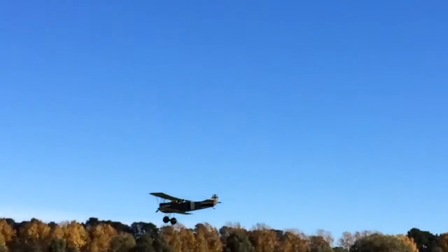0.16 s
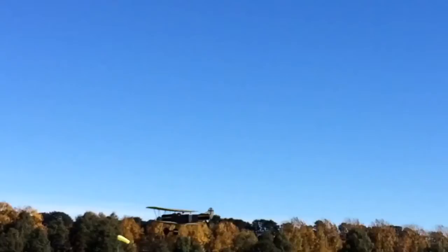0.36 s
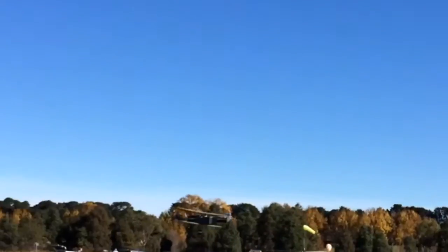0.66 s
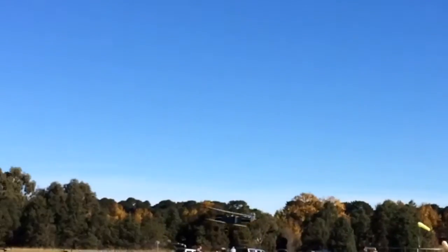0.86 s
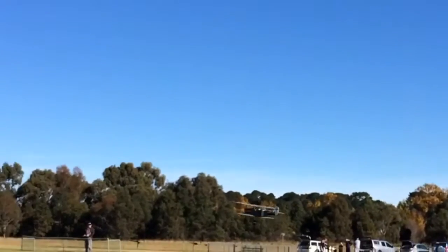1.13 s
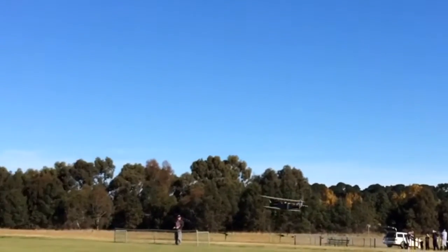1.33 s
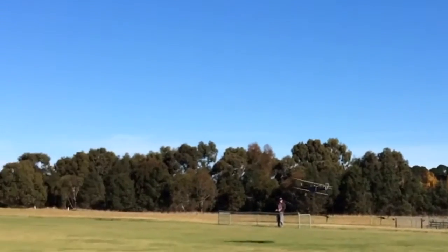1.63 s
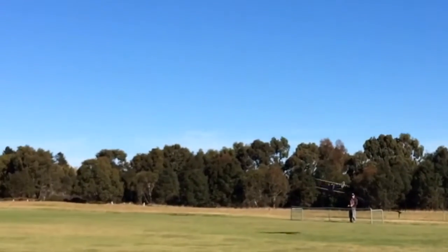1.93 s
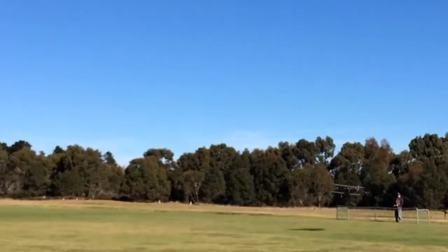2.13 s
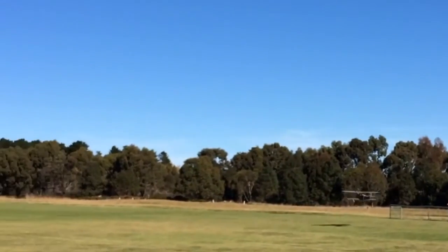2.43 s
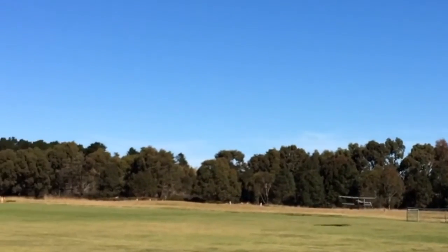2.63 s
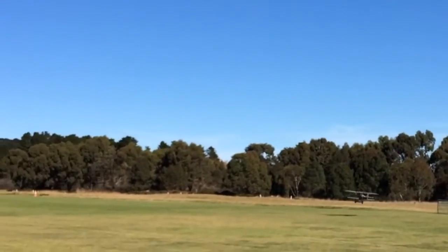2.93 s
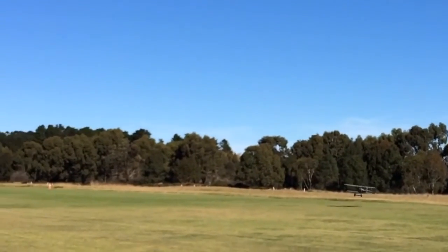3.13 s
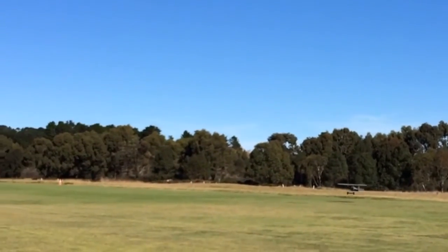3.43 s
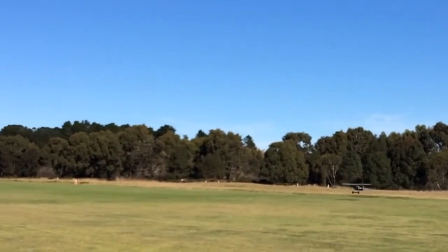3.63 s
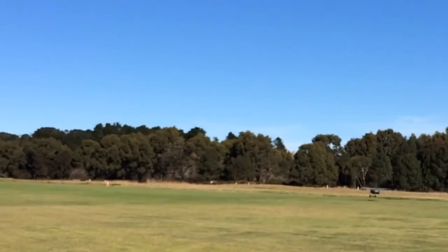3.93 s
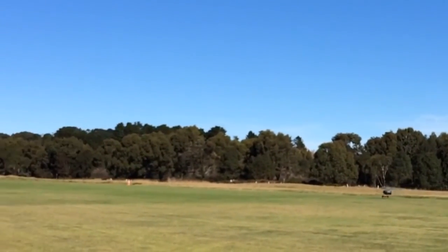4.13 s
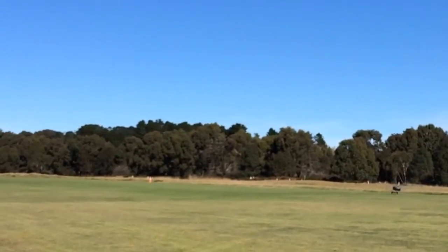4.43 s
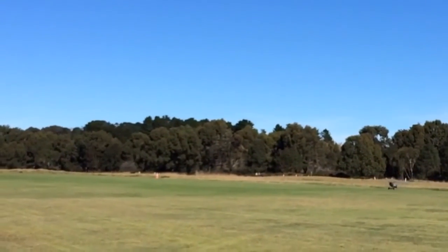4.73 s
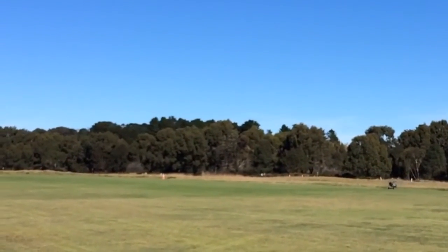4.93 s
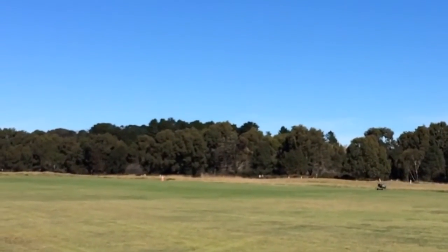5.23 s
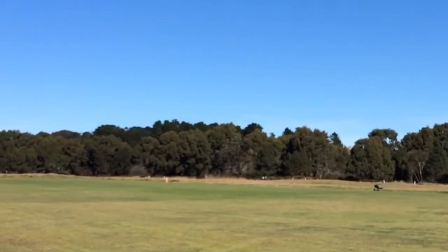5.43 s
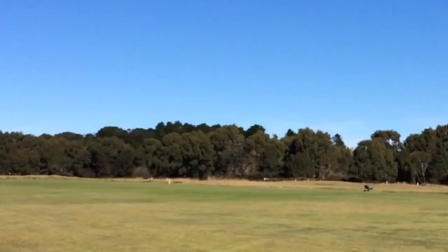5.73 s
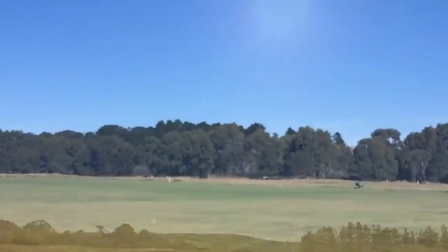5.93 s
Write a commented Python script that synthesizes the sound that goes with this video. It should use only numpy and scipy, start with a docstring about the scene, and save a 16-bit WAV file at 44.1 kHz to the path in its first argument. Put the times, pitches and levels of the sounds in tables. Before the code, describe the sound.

A small electric model biplane glides past with a faint airy whistle, over low wind on the microphone and a distant idling engine.

```python
"""A grass field, one microphone in the open. An electric model biplane glides low past, about 11 m off:
air rushes over it, its wires whistle, its propeller winds down and its motor controller sings thinly.
Low wind lies on the microphone. Far off, leaves hiss and an engine idles with a light clatter.
An insect trills and a bird buzzes; then the plane's wheels brush through the grass, a sleeve rustles
and a second bird rasps. Near the end come a sharp click and a low thump."""
import sys
import numpy as np
from scipy import signal
from scipy.fft import rfft, irfft
from scipy.io import wavfile

SR = 44100
rng = np.random.default_rng(int(sys.argv[2]) if len(sys.argv) > 2 else 0)


def output_pcm(signal):
    """Save a mono or channel-first signal as 16-bit PCM at the path in sys.argv[1].

    Samples are clipped to [-1, 1] before scaling.
    """
    pcm = np.clip(np.atleast_2d(signal).T, -1, 1) * 32767
    wavfile.write(sys.argv[1], SR, np.round(pcm).astype(np.int16))


N = 267246
TIME = np.arange(N) / SR


def from_db(db):
    """Decibels to gain."""
    return 10 ** (np.asarray(db) / 20)


def rms_one(x):
    """Scale to unit rms."""
    return x / np.sqrt(np.mean(x ** 2) + 1e-20)


def in_time(rows):
    """Each column after t/s, interpolated at every sample."""
    s, *columns = np.transpose(rows)
    return [np.interp(TIME, s, c) for c in columns]


def swell(s, rise_s, fall_s):
    """An envelope with a rounded top of 1 at time s and exponential flanks."""
    age = TIME - s
    return np.exp(1 - np.hypot(age / np.where(age < 0, rise_s, fall_s), 1))


def swells(rows):
    """Gains of two layers, summed in power over rows of t/s, first/dB, second/dB, rise/s, fall/s."""
    return np.sqrt(sum((from_db([[first], [second]]) * swell(s, rise, fall)) ** 2
                       for s, first, second, rise, fall in rows))


def humps(rows):
    """A sum of even-sided swells over rows of t/s, height, half length/s."""
    return sum(height * swell(s, half_s, half_s) for s, height, half_s in rows)


def turns(hz):
    """Cycles completed by a moving frequency."""
    return np.cumsum(hz) / SR


def drift(rate_hz):
    """Random wander of rms 1, mostly slower than rate_hz."""
    f = np.arange(N // 2 + 1) * SR / N
    return rms_one(irfft(rfft(rng.standard_normal(N)) * (f > 0) / (1 + (f / rate_hz) ** 2) ** 2, N))


def noise(colour):
    """Noise of rms 1 with a spectrum shaped by rows of f/Hz, level/dB."""
    hz, db = np.transpose(colour)
    f = np.maximum(np.arange(N // 2 + 1) * SR / N, 1)
    shape = from_db(np.interp(np.log(f), np.log(hz), db))
    skirts = np.minimum(f / hz[0], 1) ** 2 * np.minimum(hz[-1] / f, 1) ** 2
    return rms_one(irfft(rfft(rng.standard_normal(N)) * shape * skirts, N))


def resonate(x, hz, width_hz):
    """One resonance with a peak gain of 1."""
    r = np.exp(-np.pi * width_hz / SR)
    feedback = [1, -2 * r * np.cos(2 * np.pi * hz / SR), r * r]
    return signal.lfilter(np.array([1, 0, -1]) * (1 - r * r) / 2, feedback, x + 1e-18)


def tone(hz, waver_hz, rate_hz, flutter_db):
    """A tone of rms about 1 whose pitch wavers (at up to about rate_hz) and whose level flutters."""
    phase = turns(hz + waver_hz * drift(rate_hz)) + rng.random()
    return np.sqrt(2) * np.sin(2 * np.pi * phase) * from_db(flutter_db * drift(19))


PASS_S, DISTANCE_M, SPEED_M_PER_S = 0.78, 10.7, 6.4
TAIL_ON_S, TURN_S = 0.88, 0.084   # when, and how quickly, the plane shows its tail
# Doppler shift and slowing, heard at the microphone: t/s, pitch as a share of that on approach
PASS_PITCH = [(.6, 1.0), (.8, .955), (1.0, .905), (1.18, .875), (1.45, .85), (2.4, .83)]
def plane():
    """The plane flies a straight line past the microphone: its sound falls with distance, its pitch sinks."""
    pitch, = in_time(PASS_PITCH)
    nearness = DISTANCE_M / np.hypot(DISTANCE_M, SPEED_M_PER_S * (TIME - PASS_S))
    behind = (1 + np.tanh((TIME - TAIL_ON_S) / (2 * TURN_S))) / 2
    return nearness * (wires(pitch) + propeller(pitch, behind) + airflow(behind))


# Thin wires, in spells as the air catches them: t/s, f/Hz on approach, level/dB at 10.7 m, half length/s
THIN_WIRES = [(0.283, 2240, -67, 0.11), (0.72, 2214, -65.5, 0.079), (.8, 1022, -63, 0.069),
              (0.927, 2260, -70, 0.047), (1.07, 2650, -68, 0.046), (2.15, 2530, -69.5, .09)]
# The main wire, right through the pass: t/s, level/dB at 10.7 m
MAIN_WIRE = [(0, -63), (.22, -65), (.36, -71), (.54, -64.5), (.7, -62), (.95, -66.5), (1.17, -69.5),
             (1.33, -71), (1.7, -105)]
def wires(pitch, main_hz=802):
    """Air streaming across the wires makes them whistle."""
    thin = 0
    for s, hz, db, half_s in THIN_WIRES:
        whistle = tone(hz * pitch, waver_hz=8.45, rate_hz=31.5, flutter_db=1.5)
        thin += from_db(db) * swell(s, half_s, half_s) * whistle
    main_db, = in_time(MAIN_WIRE)
    return thin + from_db(main_db) * tone(main_hz * pitch, waver_hz=8.6, rate_hz=46, flutter_db=0.7)


# The propeller's harmonics: multiple of the blade rate, relative level/dB
BLADE_HARMONICS = [(2, -16), (3, 7.5), (4, 7.5), (5, 2)]
def propeller(pitch, behind, blade_hz=449.4, throttle_db=14.5, wind_down_s=0.3):
    """The blades chop out a rough hum that fades as they wind down and is weaker from behind."""
    level_db = -83 - 8 * behind + throttle_db * np.exp(-TIME / wind_down_s)
    hum = sum(from_db(db) * tone(k * blade_hz * pitch, waver_hz=28.9, rate_hz=80, flutter_db=4.5)
              for k, db in BLADE_HARMONICS)
    return from_db(level_db) * hum


# The low rush and the high hiss of air on the plane: f/Hz, relative level/dB
RUSH_SPECTRUM = [(300, -18), (600, 3), (800, 3.5), (1050, 8), (1400, 2), (1800, -7), (2200, 1), (3000, -32),
                 (5000, -26)]
HISS_SPECTRUM = [(1000, -3), (2000, -9.5), (3200, -0.5), (5000, -1.5), (6300, 2), (7700, -2.5), (8900, 0),
                 (10200, -5), (11700, -3.5), (13000, -9.5), (15500, -12)]
# Swings of the hiss, flaring as wing and tail go by: t/s, level change/dB, half length/s
HISS_FLARES = [(.35, -0.5, .09), (0.645, 5, 0.022), (.79, 1, 0.022), (1.076, 5, 0.025)]
def airflow(behind, slowing_db_per_s=1.5, ground_lag_ms=1.273, lag_halved_s=2.3):
    """Air tumbles over the plane: the hiss is thrown forward, while the low rush carries behind it too."""
    side_on = swell(0.74, rise_s=0.06, fall_s=0.17)
    rush_db = -60 + 0.5 * side_on - 1.5 * behind
    hiss_db = -59 - 14 * behind - slowing_db_per_s * np.maximum(TIME - PASS_S, 0) + humps(HISS_FLARES)
    rush = from_db(rush_db + drift(23)) * noise(RUSH_SPECTRUM)
    hiss = from_db(hiss_db + 0.8 * drift(31)) * noise(HISS_SPECTRUM)
    # the echo off the grass closes in on the direct sound, so a comb sweeps upward
    lag_ms = ground_lag_ms / (1 + TIME / lag_halved_s)
    echo = np.interp(TIME - lag_ms / 1000, TIME, 0.42 * rush + 0.24 * hiss)
    return rush + hiss + echo


# The switching tone at the microphone, lowered by the pass: t/s, f/Hz
SWITCHING_PITCH = [(0, 8035), (.4, 8010), (.75, 7930), (1.2, 7885), (2, 7860)]
# It comes and goes as the plane turns: t/s, tone level/dB, side tone level/dB, rise/s, fall/s
WHINE_SPELLS = [(.06, -74, -79, .06, 0.099), (.68, -97, -91, .05, .05), (1.24, -77.5, -89, 0.21, 0.16),
                (1.62, -86, -80.5, 0.071, 0.22), (1.77, -75, -95, .015, 0.013),
                (2.04, -75, -86, 0.11, 0.091), (2.48, -84, -93, .05, .05), (3.22, -89, -91, 0.081, 0.05),
                (4.72, -89, -96, 0.08, 0.076)]
def controller(side_hz=8470):
    """The motor controller's thin switching tone and a rougher one above it, broken up by moving air."""
    hz, = in_time(SWITCHING_PITCH)
    main_gain, side_gain = swells(WHINE_SPELLS)
    main = tone(hz, waver_hz=15, rate_hz=140, flutter_db=2)
    side = tone(side_hz, waver_hz=60, rate_hz=150, flutter_db=2.5)
    return from_db(drift(70)) * (main_gain * main + side_gain * side)


# Steady wind, right on the microphone: t/s, rumble level/dB
STEADY_WIND = [(.1, -55.5), (.55, -60), (1.3, -55.5), (1.7, -53), (2.6, -52.5), (3.15, -56.5), (3.6, -52.5),
               (4.5, -51), (5.4, -49), (6, -48.5)]
# Gusts, and the thump's noise at 5.93 s: t/s, rumble level/dB, rough part level/dB, rise/s, fall/s
LOW_SURGES = [(.25, -45.5, -74, 0.1, 0.069), (.315, -55, -61, 0.011, 0.015), (.9, -65, -66, 0.02, 0.03),
              (.68, -51, -69, 0.012, 0.082), (1.58, -65, -80, 0.028, 0.033), (2.48, -59, -90, 0.2, 0.047),
              (5.36, -53, -84, 0.061, 0.043), (5.929, -35.5, -42.5, 0.0042, 0.018),
              (6.035, -36, -47.5, 0.025, 0.016)]
# The rumble and its rougher, brighter part: f/Hz, relative level/dB
RUMBLE_SPECTRUM = [(20, -19), (35, -7), (55, 2.5), (80, 0.5), (130, 2.5), (200, -3.5), (260, -12),
                   (330, -19.5), (600, -34.5)]
ROUGH_SPECTRUM = [(150, 6.5), (240, 4.5), (350, -10.5), (520, -1), (750, -16), (1000, -11.5), (2500, -21.5)]
# Single puffs, and the thump's body near 5.93 s: t/s, envelope level/dB, f/Hz, half length/s
LOW_PULSES = [(.217, -35.5, 126, 0.002), (0.3062, -31, 122, 0.003), (0.678, -39, 90, 0.0037),
              (1.596, -36, 87, 0.0098), (1.806, -31.5, 86, 0.0066), (2.433, -27.5, 71, 0.01),
              (2.968, -36, 88, 0.0083), (5.851, -41, 46, 0.011), (5.932, -18.5, 203, 0.001),
              (5.946, -34.5, 130, 0.0054), (6.036, -24.5, 125, 0.0039)]
def wind_and_thump(rough_db=-25.5):
    """Wind on the microphone rumbles, gusts and puffs. Near the end a low thump is heard as well."""
    wind_db, = in_time(STEADY_WIND)
    steady = from_db([wind_db, wind_db + rough_db])
    rumble_gain, rough_gain = np.hypot(steady, swells(LOW_SURGES))
    low = rumble_gain * from_db(2.06 * drift(8.4)) * noise(RUMBLE_SPECTRUM)
    low += rough_gain * noise(ROUGH_SPECTRUM)
    for s, db, hz, half_s in LOW_PULSES:
        low -= from_db(db) * swell(s, half_s, half_s) * np.sin(2 * np.pi * hz * (TIME - s))
    return low


# Leaves, far from the microphone: f/Hz, relative level/dB
LEAF_SPECTRUM = [(200, -31), (330, -3), (440, 1.5), (580, -6), (900, 5), (1200, 3.5), (1650, 3),
                 (2050, -1.5), (2600, -2.5), (3300, -10.5), (4200, -19.5), (6500, -25), (8700, -23),
                 (11000, -31), (15000, -27.5)]
# Small swells of breeze in them: t/s, extra level/dB, half length/s
LEAF_BREEZES = [(3.8, 2.1, 0.16), (4.83, 1.4, 0.15)]
def leaves(level_db=-60):
    """Leaves hiss in the breeze, each part of the middle range swelling by itself."""
    hiss = noise(LEAF_SPECTRUM)
    patches = sum(drift(34) * resonate(hiss, hz, width_hz=93) for hz in np.geomspace(800, 2200, 9))
    return from_db(level_db + humps(LEAF_BREEZES) + 0.5 * drift(14)) * (hiss + 0.31 * patches)


# An engine idling far off: t/s, speed/rpm
IDLE_SPEED = [(.5, 1421), (1.7, 1438.5), (3.7, 1430.6), (5.7, 1409.7)]
def engine():
    """One turning shaft times both the engine's throb and its clatter."""
    rpm, = in_time(IDLE_SPEED)
    shaft = turns(rpm / 60) + 1 / 4
    return throb(shaft) + clatter(shaft)


# The throb at the microphone: t/s, overall level/dB, thud against knock/dB, knock tilt/(dB per octave)
THROB_BALANCE = [(0, -53.5, 2.5, 5.5), (1.05, -52, -2, 6), (1.3, -49.5, -2.5, 6), (1.95, -43.5, -3.5, 2.5),
                 (2.35, -43.5, -0.5, 1.5), (3.12, -47, -4, 1.5), (3.5, -44.5, 1.5, 0.5),
                 (4.7, -44.5, 1.5, -5), (5.3, -44.5, 2, 0), (5.8, -42.5, -1, -0.5)]
# Its uneven running: t/s, share by which even turns beat harder and odd turns softer
THROB_LIMP = [(.95, 0.083), (1.42, -0.41), (1.82, -0.24), (1.93, 0.77), (2.06, -0.7), (2.3, 0.52),
              (2.75, 0.11), (2.97, -.55), (3.15, 0.45), (3.52, -0.4), (3.71, -0.099), (4.05, 0.39),
              (4.58, 0.42), (4.79, -0.98), (4.95, -0.52), (5.12, 0.69), (5.3, -0.91), (5.55, 0.38),
              (5.66, -0.67), (5.77, .45)]
# Its harmonics, four of thud and then the knock: multiple of the shaft rate, relative level/dB
SHAFT_HARMONICS = [(2, -22), (3, 1.5), (4, 1.5), (5, -11.5), (6, 1), (7, -5), (8, -11.5), (9, -5.5),
                   (10, -8), (11, -22.5), (12, -35), (14, -52)]
def throb(shaft, knock_turn=0.459, jitter_rad=0.2):
    """Each turn gives a dull thud, alternately strong and weak, then a sharper knock."""
    level_db, thud_db, tilt_db = in_time(THROB_BALANCE)
    limp, = in_time(THROB_LIMP)
    low, high = SHAFT_HARMONICS[:4], SHAFT_HARMONICS[4:]
    thud_gain = from_db(thud_db) * (1 + limp * np.cos(np.pi * shaft) + 0.073 * drift(12))
    thud = sum(from_db(db) * np.cos(2 * np.pi * k * shaft) for k, db in low)
    knock = 0
    for k, db in high:
        gain = from_db(db + tilt_db * np.log2(k / high[0][0]) + drift(6.9))
        knock += gain * np.sin(2 * np.pi * k * (shaft - knock_turn) + jitter_rad * drift(13))
    return from_db(level_db) * rms_one(thud_gain * thud + knock)


# Runs in which the far engine's clatter swells: t/s, extra level/dB, half length/s
CLATTER_SWELLS = [(1.4, 1, 0.095), (1.7, 0.5, 0.042), (2.75, 1, 0.02), (3.18, 4, 0.05), (3.52, 3, 0.018),
                  (3.97, 5.5, 0.066), (4.235, 2, 0.019), (4.58, 2, 0.032), (4.95, 5.5, 0.028),
                  (5.27, 5.5, 0.018), (5.56, 7.5, 0.017), (5.88, 3.5, 0.043)]
# Its sharpest ticks: t/s, envelope level/dB
SHARP_TICKS = [(1.427, -60), (2.177, -48.5), (2.276, -50), (2.335, -46.5), (2.6934, -43.5), (2.7304, -48),
               (2.7487, -52), (2.902, -52), (3.096, -47.5), (3.169, -53), (3.201, -50), (3.479, -52),
               (4.175, -53), (4.188, -49), (4.2182, -46), (4.228, -51), (4.2448, -46.5), (4.324, -54),
               (4.533, -49.5), (4.575, -50), (4.594, -48), (4.719, -47.5), (4.758, -49.5), (4.7834, -48.5),
               (4.889, -47.5), (4.93, -50), (5.363, -48), (5.524, -52), (5.792, -51.5), (5.8403, -47),
               (5.878, -54)]
def clatter(shaft, clicks_per_s=540, force_db=-43.5, fade_in_s=0.65):
    """Light uneven clicks, loosely bunched three times a turn, ring two close, short metallic resonances."""
    bunch = 1 + 0.7 * np.cos(2 * np.pi * 3 * (shaft - 0.48))
    clicks = (rng.random(N) < clicks_per_s * bunch / SR) * rng.choice([-1, 1], N)
    strength = from_db(4 * np.tanh(rng.standard_normal(N)) + 5.2 * np.tanh(drift(76)))
    fade_in = 1 - np.exp(-TIME / fade_in_s)
    force = from_db(force_db + humps(CLATTER_SWELLS)) * fade_in * rms_one(clicks * strength)
    ticks = np.zeros(N)
    for s, db in SHARP_TICKS:
        age = np.maximum(TIME - s, 0)
        envelope = from_db(db) * age / 0.0012 * np.exp(1 - age / 0.00098)
        ping = np.sin(2 * np.pi * rng.normal(2636, 60) * age)
        ticks += envelope * (from_db(2.5) * ping + from_db(-12) * rng.standard_normal(N))
    pair = resonate(force, hz=2698, width_hz=297) - 0.6 * resonate(force, hz=2370, width_hz=530)
    ring = resonate(pair, hz=2740, width_hz=16700)
    lowpass = signal.butter(1, 11000, fs=SR, output="sos")
    return ring + signal.sosfilt(lowpass, from_db(-35.5) * force + ticks)


# An insect out in the field, phrase by phrase: loudest at t/s, f/Hz there, level/dB, half length/s
TRILL_PHRASES = [(1.351, 8050, -72.5, 0.087), (1.9, 8150, -74, 0.054), (2.4, 8250, -77, 0.11),
                 (2.878, 8180, -77.5, 0.15), (3.37, 8100, -75.5, 0.097), (3.811, 8140, -76, 0.13),
                 (4.23, 8030, -76, 0.15), (4.715, 8000, -73.5, 0.069), (5.188, 8150, -75, 0.091),
                 (5.666, 8180, -73, 0.11)]
def insect(notes_per_s=27.6, climb_hz_per_s=1200, note_fall_hz=550):
    """Short notes each fall in pitch while their phrase climbs; the trees scatter them into a blur."""
    note_phase = (notes_per_s * TIME) % 1
    note_gain = np.sin(np.pi * note_phase) ** 4
    phrases = 0
    for s, hz, db, half_s in TRILL_PHRASES:
        note_hz = hz + climb_hz_per_s * (TIME - s) - note_fall_hz * (note_phase - 0.5)
        trill = tone(note_hz, waver_hz=199, rate_hz=510, flutter_db=1.5)
        phrases += from_db(db) * swell(s, half_s, half_s) * trill
    build_up = np.clip(TIME - TRILL_PHRASES[0][0], 0, 1)
    scattered = from_db(-85.5) * build_up * tone(8160, waver_hz=305, rate_hz=850, flutter_db=3)
    return note_gain * phrases + scattered


def buzzing_bird(middle_s=1.78, half_s=0.24, level_db=-78.5, hz=5340, sag_hz_per_s=320):
    """A far bird holds a thin, gently falling buzz that droops as it ends."""
    held = np.exp(-((TIME - middle_s) / half_s) ** 6)
    droop_hz = 162 * swell(middle_s + half_s, rise_s=0.063, fall_s=0.063)
    buzz_hz = hz - sag_hz_per_s * (TIME - middle_s) - droop_hz
    return from_db(level_db) * held * tone(buzz_hz, waver_hz=150, rate_hz=315, flutter_db=1.5)


# The plane's wheels, down the field after landing: f/Hz, relative level/dB
WHEEL_SPECTRUM = [(700, -33), (1100, 8), (1500, 7), (2000, -9), (3000, -30)]
def wheels(level_db=-65):
    """Grass blades brush the rolling wheels with a grainy rasp."""
    roll = swell(4.73, rise_s=0.2, fall_s=0.23)
    return from_db(level_db + 2 * drift(90)) * roll * noise(WHEEL_SPECTRUM)


# Strokes of a sleeve, at the microphone: t/s, swish level/dB, fine hiss level/dB, rise/s, fall/s
SLEEVE_STROKES = [(4.95, -78, -90, .025, 0.045), (5.2, -98, -76.5, 0.17, 0.094),
                  (5.413, -81, -75, 0.011, 0.014), (5.78, -77, -100, 0.064, 0.12)]
# The cloth's swish and the fine hiss of its fibres: f/Hz, relative level/dB
SWISH_SPECTRUM = [(2400, -32), (3300, -13), (3900, -8), (4900, -13), (6500, -12), (8500, -37), (12000, -48),
                  (15000, -38)]
FIBRE_SPECTRUM = [(4000, -19), (6000, 8), (9000, 7), (12000, 2), (14000, -17)]
def sleeve():
    """Cloth slides over cloth with a grainy swish and a fine hiss."""
    swish_gain, fibre_gain = swells(SLEEVE_STROKES)
    grain = from_db(2 * drift(110))
    return grain * (swish_gain * noise(SWISH_SPECTRUM) + fibre_gain * noise(FIBRE_SPECTRUM))


# A second bird's call, in three parts: t/s, pitched core level/dB, rasp level/dB, rise/s, fall/s
CALL_PARTS = [(5.413, -70, -62.5, 0.011, 0.011), (5.49, -68.5, -68, 0.049, 0.059),
              (5.61, -76, -86, .03, 0.065)]
# The two close tones of its core, and the spectrum of its rasp: f/Hz, relative level/dB
CORE_TONES = [(3660, -0.5), (4090, 1)]
RASP_SPECTRUM = [(3200, -11), (4200, -1), (4750, -6), (5100, -6), (5600, -5), (6350, -7), (7300, -10),
                 (8800, -22)]
def rasping_bird(sag_hz_per_s=200):
    """A harsh call opens with a noisy rasp, and its two rough tones ring on, sinking slightly."""
    core_gain, rasp_gain = swells(CALL_PARTS)
    sag_hz = sag_hz_per_s * (TIME - CALL_PARTS[0][0])
    core = sum(from_db(db) * tone(hz - sag_hz, waver_hz=210, rate_hz=265, flutter_db=1)
               for hz, db in CORE_TONES)
    return from_db(2 * drift(150)) * (core_gain * core + rasp_gain * noise(RASP_SPECTRUM))


def click(start_s=5.9212, level_db=-25.5, rise_s=0.000018, fall_s=0.0021):
    """One sharp click near the end, just ahead of the low thump."""
    age = np.maximum(TIME - start_s, 0)
    return -from_db(level_db) * (1 - np.exp(-age / rise_s)) * np.exp(-age / fall_s)


def scene():
    """All the sounds, summed to one channel."""
    mix = plane() + controller() + wind_and_thump() + leaves() + engine()
    mix += insect() + buzzing_bird() + wheels() + sleeve() + rasping_bird() + click()
    return mix[None]


def record(dry, cutoff_hz=15300):
    """The top of the treble is cut steeply."""
    return signal.sosfilt(signal.ellip(12, 0.1, 80, cutoff_hz, fs=SR, output="sos"), dry)


dry = scene()
out = record(dry)
output_pcm(out)
```